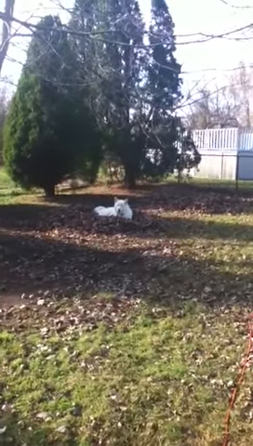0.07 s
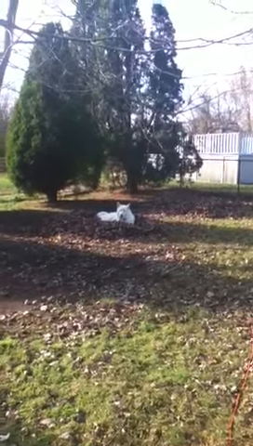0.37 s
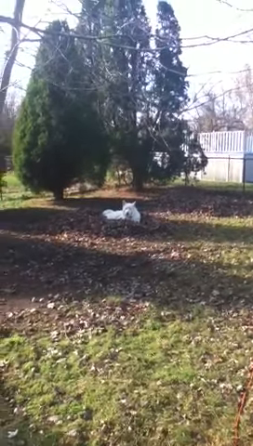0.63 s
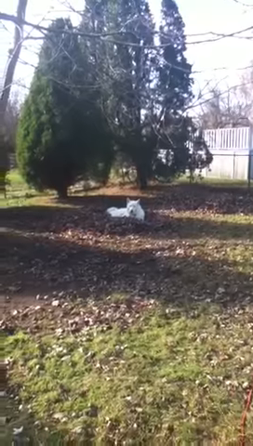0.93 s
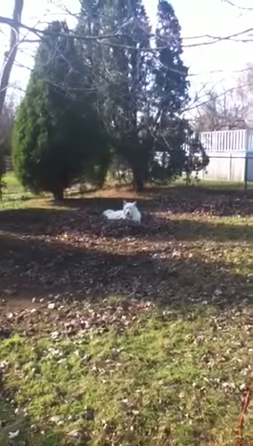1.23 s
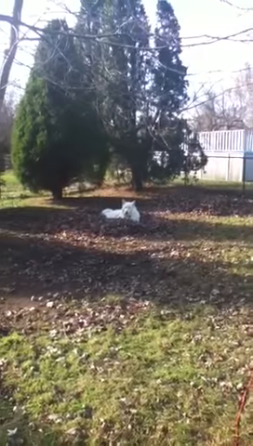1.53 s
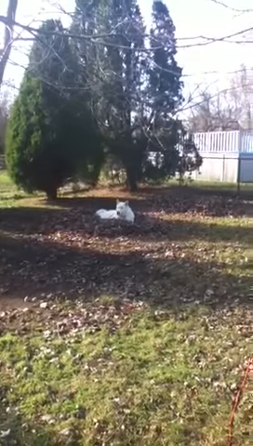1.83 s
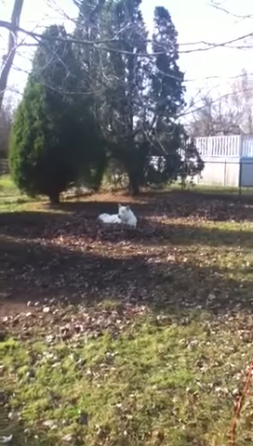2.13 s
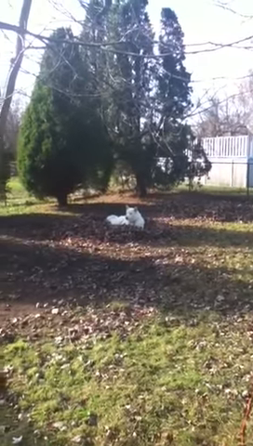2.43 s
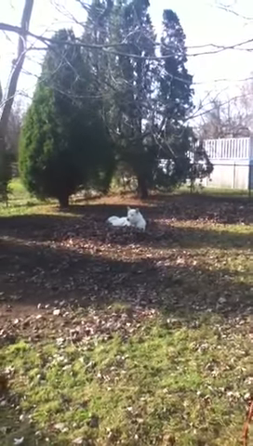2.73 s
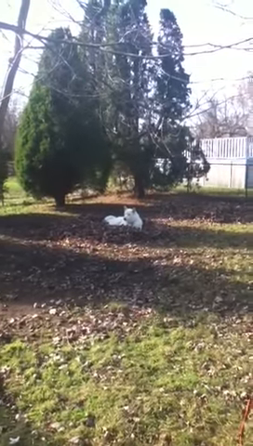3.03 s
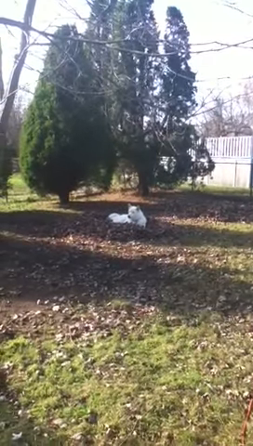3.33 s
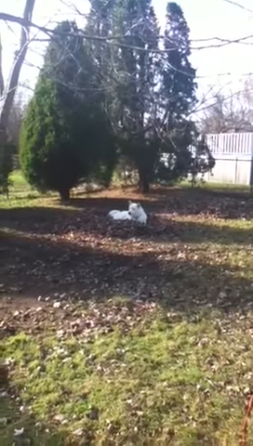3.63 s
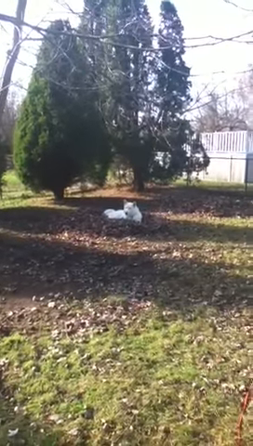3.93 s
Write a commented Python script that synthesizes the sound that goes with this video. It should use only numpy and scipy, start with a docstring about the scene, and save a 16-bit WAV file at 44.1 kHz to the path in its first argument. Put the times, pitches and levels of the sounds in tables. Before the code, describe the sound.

Wind rumbles and thumps unevenly on a close microphone in an open yard. Dry leaves rustle softly and crackle nearby, then a gust swells the rustle near the end and a few twigs snap.

```python
"""A breeze over dry leaves in an open yard, heard through a small hand-held microphone.
From the start, turbulence rumbles and eddies thump on the microphone over a faint outdoor hush.
The leaves rustle softly, then settle, while single ones crackle close by and the odd twig snaps.
Past halfway the thumps crowd together. Near the end a gust swells the rustle, more twigs break,
and the leaves die down."""
import sys
import numpy as np
from scipy import signal
from scipy.fft import rfft, irfft
from scipy.io import wavfile
from scipy.ndimage import uniform_filter1d

SR = 44100
rng = np.random.default_rng(int(sys.argv[2]) if len(sys.argv) > 2 else 0)


def unload_wav(signal):
    """Save mono or channel-first audio to the path in sys.argv[1] as 16-bit WAV at rate SR, clipped to [-1, 1]."""
    wavfile.write(
        sys.argv[1],
        SR,
        np.round(np.clip(np.atleast_2d(signal).T, -1, 1) * 32767).astype(np.int16),
    )


N = 176400  # 4 s


# Eddies that hit the microphone: time_s, relative_level_db, half_length_s
EDDY_HITS = [(0.506, -13, 0.004), (0.533, -19, 0.0018), (0.544, -18.5, 0.0016), (0.618, -24.5, 0.002),
             (.757, -22.5, 0.002), (.794, -27, 0.0025), (1.017, -17, 0.0023), (1.111, -20, 0.0038),
             (1.467, -27.5, 0.0022), (2.151, -25, 0.0023), (2.245, -17, 0.0033), (2.328, -18.5, 0.0019),
             (2.375, -13.5, 0.0043), (2.537, -13, 0.0015), (2.551, -10.5, 0.0018), (2.593, -14, 0.0025),
             (2.738, -10.5, 0.0041), (2.756, -17, 0.0022), (2.783, -19, 0.0016), (2.82, -15, 0.0022),
             (2.873, -14, 0.0025), (2.912, -11, 0.002), (2.93, -16.5, 0.0035), (3.213, -17.5, 0.0026),
             (3.26, -15, 0.0017), (3.308, -17, 0.0019), (3.463, -12.5, 0.001), (3.84, -22, 0.0017),
             (3.916, -14, 0.0026)]

def wind_thumps(gain_db=2.4):
    """Strong eddies hit the microphone one by one."""
    return microphone(sum(amp(db + gain_db) * eddy(s, half_s) for s, db, half_s in EDDY_HITS))


def eddy(centre_s, half_s):
    """A brief, rounded push of pressure."""
    distance = abs(np.arange(N) / SR - centre_s) / half_s
    return 1 / np.cosh(2 * np.minimum(distance, 20))


def microphone(push, low_cut_hz=102.5, ring_hz=131, ring_q=2.2, ring_db=-18):
    """The microphone's bass cut and low resonance turn a push of pressure into a thump."""
    thump = high_pass(push, low_cut_hz, order=4)
    return thump + amp(ring_db) * resonate(thump, ring_hz, ring_q)


# Rise and fall of the wind at the microphone: time_s, level_db
RUMBLE_FADER = [(0, -54), (.12, -37), (.25, -49.5), (.45, -46.5), (.68, -40), (.9, -49.5), (1.14, -40.5),
                (1.23, -46), (1.79, -50.5), (1.86, -34), (1.94, -44.5), (2.32, -39), (2.43, -46.5),
                (2.53, -30.5), (2.68, -41.5), (2.92, -36), (3.03, -46), (3.28, -33), (3.72, -44.5),
                (3.87, -36), (4, -43.5)]
# Bass-heavy tone of the turbulence: frequency_hz, gain_db
RUMBLE_EQ = [(20, -18), (70, 0), (120, 0), (200, -3.5), (300, -14), (500, -30.5), (3000, -76)]

def wind_rumble(lumps_db=2.5, lumps_hz=82):
    """Lumpy turbulence fills in between the thumps."""
    lumpy = unit(rng.standard_normal(N) * amp(lumps_db * wander(lumps_hz)))
    return colour(lumpy, RUMBLE_EQ) * amp(follow(RUMBLE_FADER, np.arange(N) / SR))


# Swell of the leaf bed, cresting with the gust: time_s, level_db
RUSTLE_FADER = [(0, -45.5), (.09, -44), (.19, -49), (.32, -45), (.41, -49), (.58, -50), (.78, -60),
                (1.12, -56), (1.55, -59), (1.87, -48.5), (2.03, -53), (2.15, -51), (2.4, -63), (2.62, -56),
                (2.98, -44.5), (3.12, -37), (3.36, -37), (3.45, -30.5), (3.51, -36.5), (3.6, -36.5),
                (3.8, -40.5), (4, -51)]
# Broad, papery tone of the leaf bed: frequency_hz, gain_db
RUSTLE_EQ = [(400, 0.5), (750, -6), (1400, -6.5), (4900, -13), (9000, -14.5), (11900, -19), (16000, -29.5)]

def leaf_rustle(ticks_db=-8.5, flicker_db=0.79, patch_db=1.5, pivot_hz=2900, pivot_db=-36):
    """Near ticks and the flickering hiss of far leaves rise together and grow fuller with the gust."""
    grain = rng.standard_normal(N) + amp(ticks_db) * leaf_ticks()
    grain = unit(high_pass(colour(grain, RUSTLE_EQ), hz=240, order=2))
    grain *= amp(flicker_db * wander(rate_hz=27))
    hz, t, bands = signal.stft(grain, SR, nperseg=256)
    level_db = follow(RUSTLE_FADER, t)
    patches = uniform_filter1d(rng.standard_normal(bands.shape), size=9, axis=0)  # smeared in pitch
    patches = unit(uniform_filter1d(patches, size=5, axis=1))  # and in time
    octaves = np.log2(np.maximum(hz, 500) / pivot_hz)[:, None]
    tilt_db = -0.12 * octaves * (level_db - pivot_db)  # louder is darker, softer is thinner
    return signal.istft(bands * amp(level_db + tilt_db + patch_db * patches), SR, nperseg=256)[1][:N]


def leaf_ticks(per_s=1600, pitches=32, spread_db=3, decay_cycles=1.86):
    """Countless leaf edges touch, each with a tick of a few cycles."""
    out, t = np.zeros(N), np.arange(512) / SR
    for hz in np.linspace(700, 14000, pitches):
        strength = amp(spread_db * np.minimum(rng.exponential(1, N), 5))
        touches = rng.random(N) < per_s / pitches / SR
        tick = np.sin(2 * np.pi * hz * t) * np.exp(-t * hz / decay_cycles)
        out += signal.oaconvolve(strength * touches * rng.choice([-1, 1], N), unit(tick))[:N]
    return unit(out)


# Close leaves that snap (short) or crunch (long): start_s, level_db, decay_s, tilt_db_per_octave
CRACKLE_HITS = [(.177, -34, 0.0009, 1), (0.227, -37, 0.013, 2.5), (0.2919, -34.5, 0.0024, 2.5),
                (1.004, -46, 0.047, 4.5), (1.264, -39.5, 0.0039, 0.5), (1.385, -48.5, 0.03, 2),
                (1.569, -41.5, .006, 0.5), (1.666, -45.5, 0.031, -0.5), (1.708, -34, 0.0012, 1.5),
                (1.748, -38, 0.0015, 9), (1.779, -33.5, 0.0027, 0), (1.821, -33.5, 0.0036, 1),
                (1.849, -38.5, 0.005, -4.5), (1.893, -38, 0.0082, 0), (1.928, -39, 0.0038, 0.5),
                (1.975, -36, 0.004, 1.5), (2.097, -36, 0.0091, 2), (2.195, -37, 0.0025, 6.5),
                (2.653, -39.5, 0.0049, -1), (2.682, -37, 0.0026, 2.5), (2.736, -40.5, 0.0066, 1),
                (2.943, -35.5, 0.0052, -1), (3.017, -33, 0.0036, 0.5), (3.210, -30, 0.009, -2.5),
                (3.295, -32.5, 0.0056, -0.5), (3.381, -28, 0.017, -1), (3.424, -30.5, 0.0056, -2),
                (3.587, -27, 0.0031, -1.5)]

def leaf_crackles():
    """Near leaves give way one at a time."""
    out = np.zeros(N)
    for start_s, db, decay_s, tilt in CRACKLE_HITS:
        add(out, start_s, fracture(db, decay_s, tilt))
    return out


# Crisp tone of a dry leaf, also the base of a twig's snap: frequency_hz, gain_db
FRACTURE_EQ = [(100, -2), (400, -2), (1100, 1.5), (1800, 0.5), (3000, -3.5), (5500, -8.5), (9200, -11.5),
               (12000, -19.5), (16000, -41)]

def fracture(db, decay_s, tilt, colour_db=1.5, grain_db=4, brittle_hz=7250, size=8192):
    """A burst of tiny fractures with a colour of its own; the brittle treble dies in half the time."""
    t, hz = np.arange(size) / SR, np.fft.rfftfreq(size, 1 / SR)
    own_db = colour_db * unit(uniform_filter1d(rng.standard_normal(len(hz)), size=130))
    tilt_db = tilt * np.log2(np.maximum(hz, 900) / 3000)
    spectrum = rfft(rng.standard_normal(size)) * amp(eq_db(FRACTURE_EQ, hz) + tilt_db + own_db)
    grain = amp(grain_db * wander(rate_hz=1150, n=size))
    envelope = rise_and_decay(t / decay_s)
    body = irfft(spectrum * (hz < brittle_hz)) * unit(envelope)
    edge = irfft(spectrum * (hz >= brittle_hz)) * unit(rise_and_decay(2 * t / decay_s))
    return amp(db) * unit((body + edge) * grain) * np.sqrt(np.mean(envelope ** 2))


def rise_and_decay(age, rise=0.48):
    """A straight attack and an exponential tail; age and rise count in decay times."""
    return np.minimum(age / rise, 1) * np.exp(-np.maximum(age - rise, 0))


# Breaking twigs: start_s, snap_level_db, decay_s, tilt_db_per_octave, pitch_hz
TWIG_HITS = [(0.5096, -36, 0.0027, -11.5, 1200), (1.8238, -29.5, 0.0078, -1.5, 1410),
             (3.277, -31.5, 0.007, 3.5, 4900), (3.561, -25, 0.0036, -1, 1730),
             (3.783, -19.5, 0.001, 2.5, 8900), (3.8313, -23, 0.0037, 3, 2250),
             (3.921, -20.5, 0.0013, 6, 2950)]

def twig_snaps(ring_q=9.4, ring_db=-5.5):
    """A twig breaks, and the fracture rings the wood briefly at its own pitch."""
    out = np.zeros(N)
    for start_s, db, decay_s, tilt, pitch_hz in TWIG_HITS:
        snap = fracture(db, decay_s, tilt)
        ring = unit(resonate(snap, pitch_hz, ring_q))
        add(out, start_s, snap + amp(ring_db) * np.std(snap) * ring)
    return out


# Soft tone of the open air: frequency_hz, gain_db
HUSH_EQ = [(700, -7), (1250, -9), (2000, -18), (16000, -34)]

def outdoor_hush(level_db=-55):
    """The steady, distant wash of the outdoors."""
    air = colour(rng.standard_normal(N), HUSH_EQ)
    return amp(level_db) * unit(high_pass(air, hz=200, order=2))


def amp(db):
    """Decibels to gain."""
    return 10 ** (np.asarray(db) / 20)


def unit(x):
    """Scales to rms 1."""
    return x / np.sqrt(np.mean(x ** 2) + 1e-20)


def eq_db(eq, hz):
    """An EQ curve's gain at hz, on a log-frequency axis."""
    points_hz, db = np.transpose(eq)
    return np.interp(np.log(hz + 1), np.log(points_hz + 1), db)


def follow(fader, t):
    """A fader's level at the times t."""
    return np.interp(t, *np.transpose(fader))


def add(mix, start_s, sound):
    """Places a sound in the mix."""
    part = mix[max(round(start_s * SR), 0):][:len(sound)]
    part += sound[:len(part)]


def colour(x, eq):
    """Runs x through an EQ curve; rms 1."""
    gain = amp(eq_db(eq, np.fft.rfftfreq(len(x), 1 / SR)))
    return unit(irfft(rfft(x) * gain, len(x)))


def high_pass(x, hz, order):
    """Takes out the bass."""
    return signal.sosfilt(signal.butter(order, hz, "high", fs=SR, output="sos"), x)


def resonate(x, hz, q):
    """Rings one resonance with x."""
    return signal.lfilter(*signal.iirpeak(hz, q, SR), x)


def wander(rate_hz, n=N):
    """Smooth random drift, mostly slower than rate_hz; rms 1."""
    hz = np.fft.rfftfreq(n, 1 / SR)
    return unit(irfft(rfft(rng.standard_normal(n)) / (1 + (hz / rate_hz) ** 2), n))


def scene():
    """Wind on the microphone, leaves, twigs and the open air, in mono."""
    wind = wind_thumps() + wind_rumble()
    return (wind + leaf_rustle() + leaf_crackles() + twig_snaps() + outdoor_hush())[None]


def record(dry):
    """A steep high cut takes off the air above 16 kHz."""
    high_cut = signal.firwin(401, 16000, window=("kaiser", 9), fs=SR)
    return signal.oaconvolve(dry, high_cut[None], "same")


dry = scene()
out = record(dry)
unload_wav(out)
```